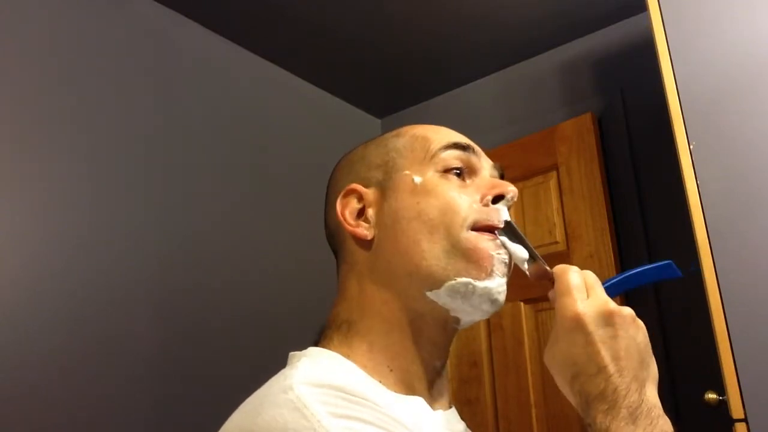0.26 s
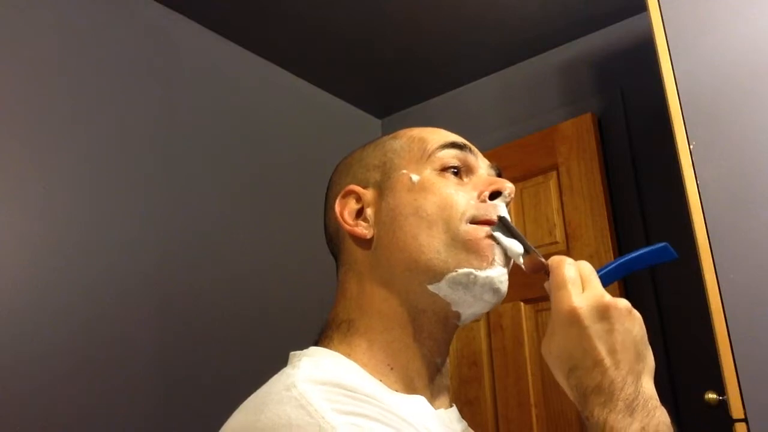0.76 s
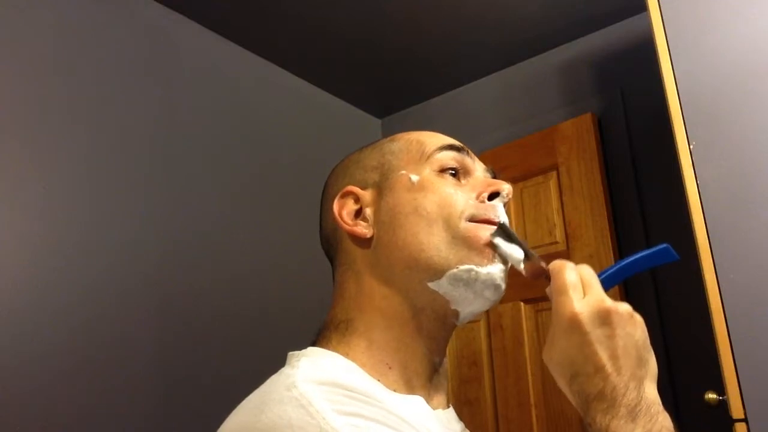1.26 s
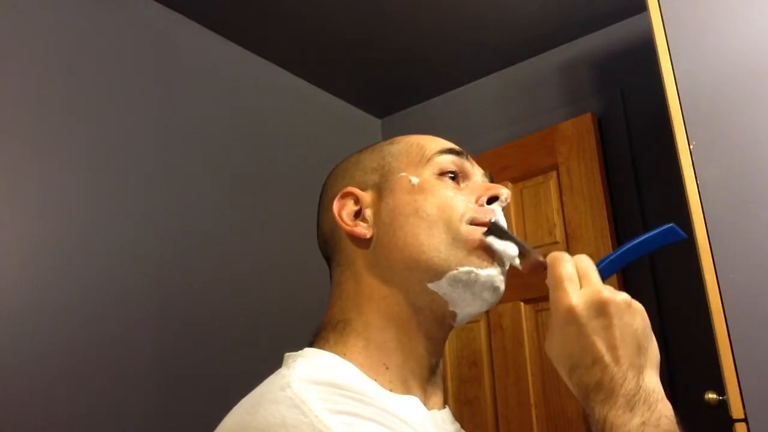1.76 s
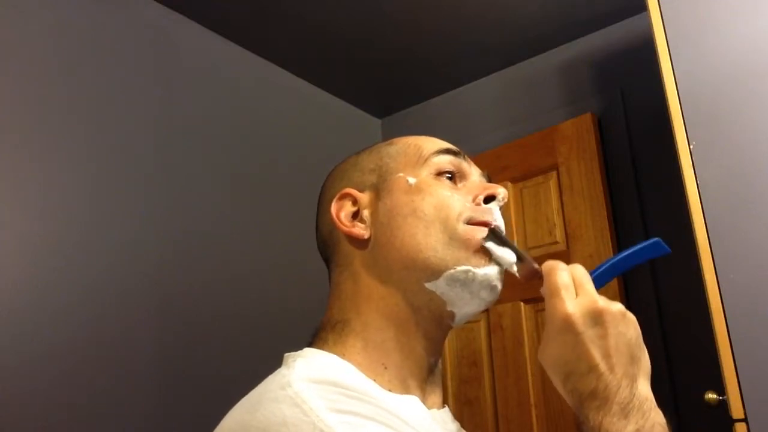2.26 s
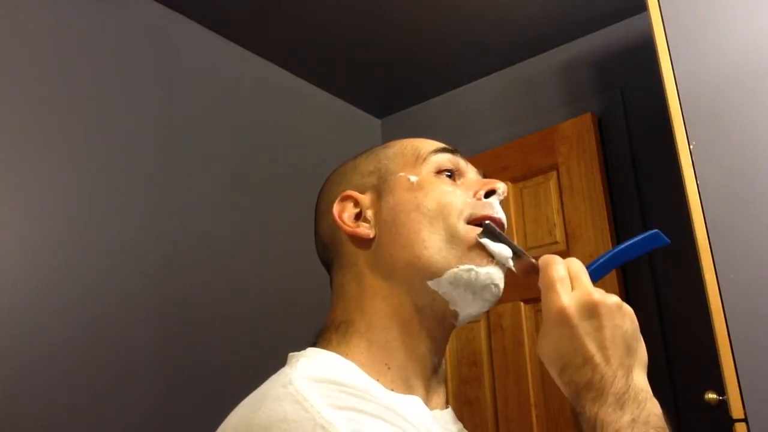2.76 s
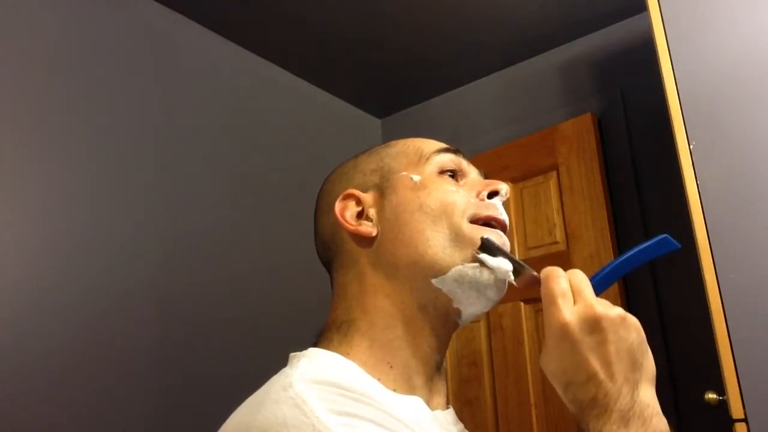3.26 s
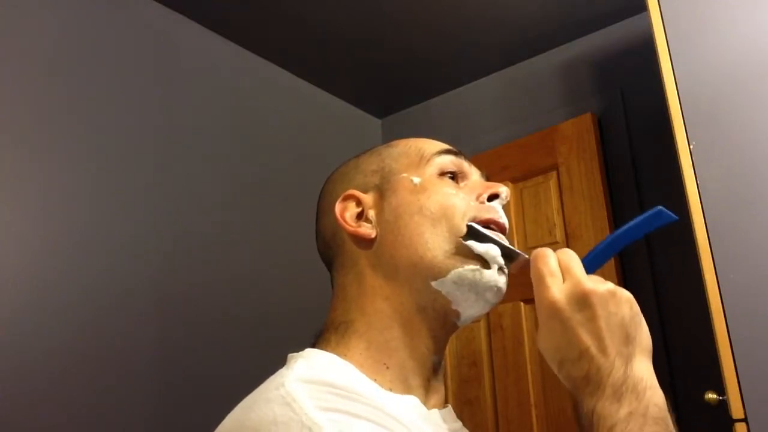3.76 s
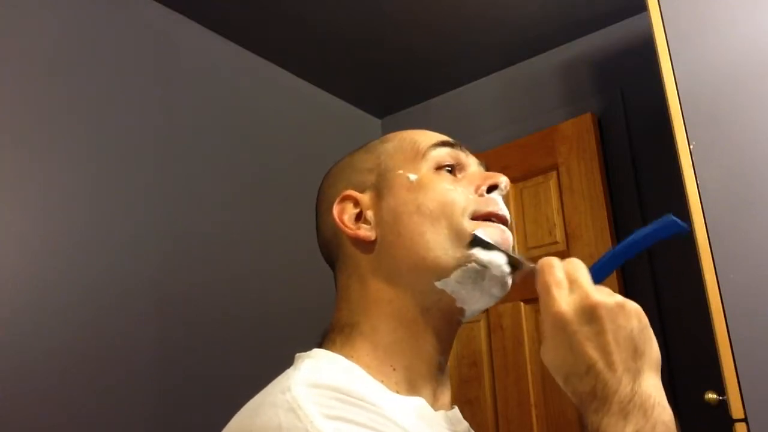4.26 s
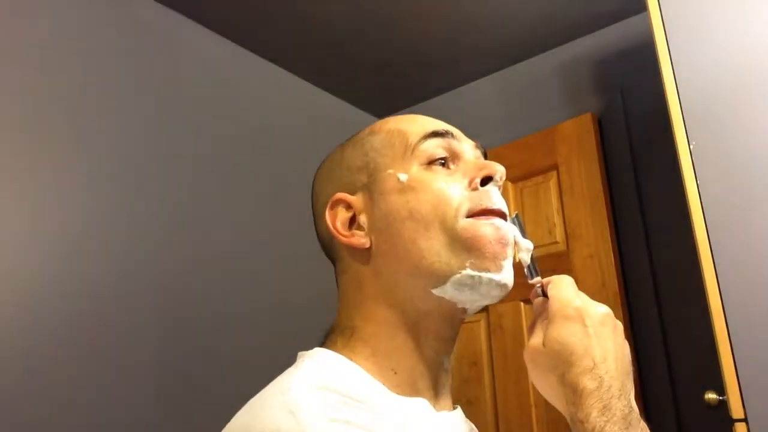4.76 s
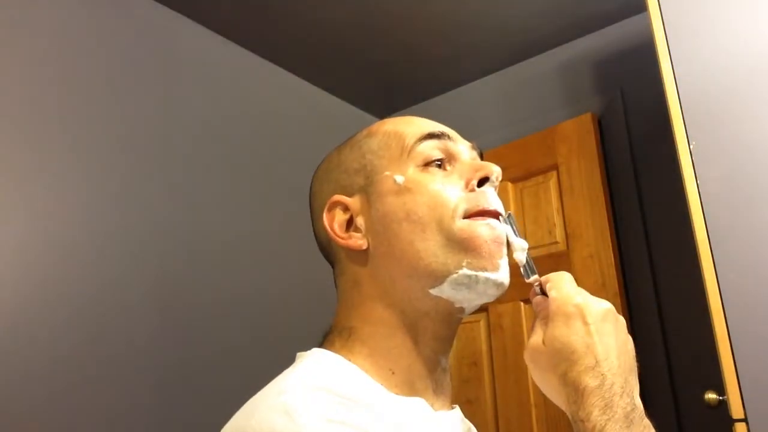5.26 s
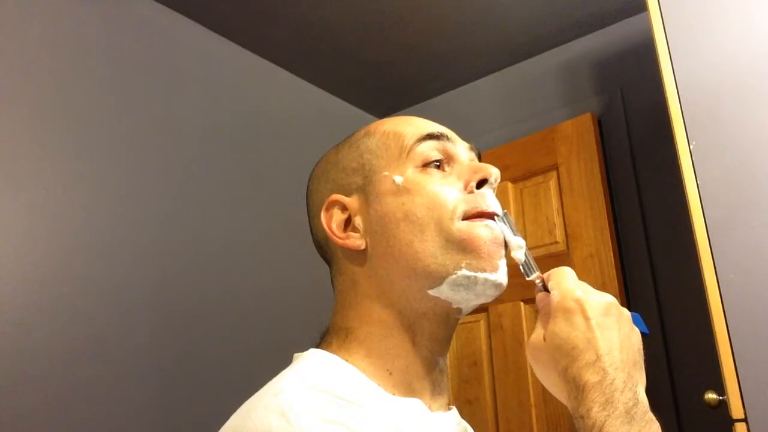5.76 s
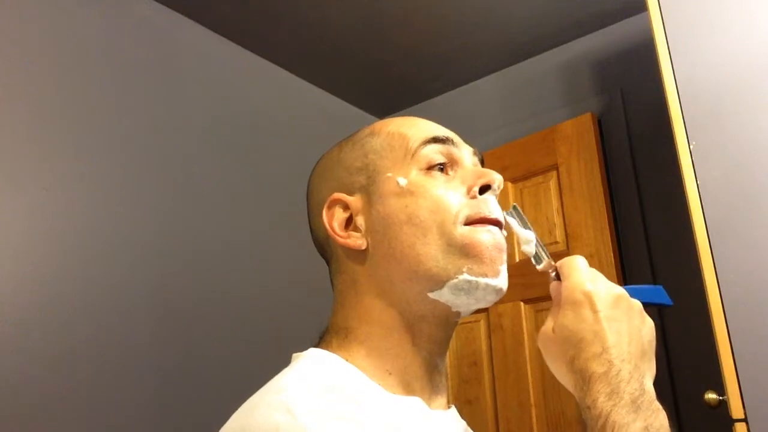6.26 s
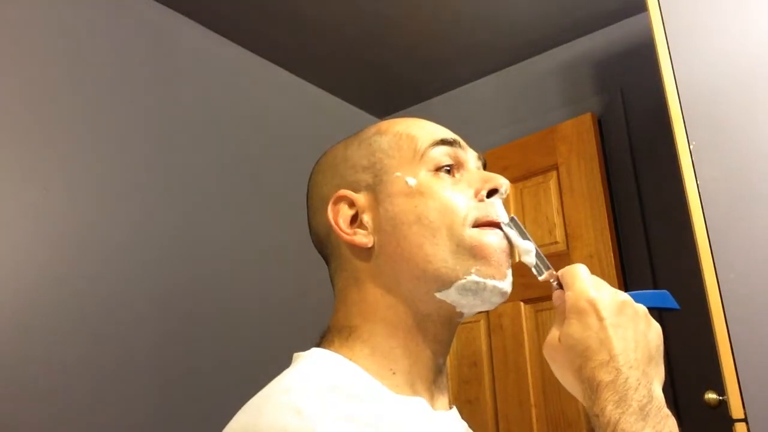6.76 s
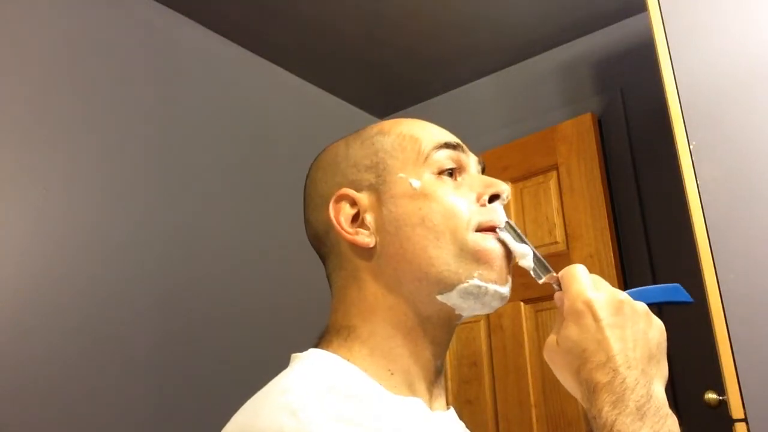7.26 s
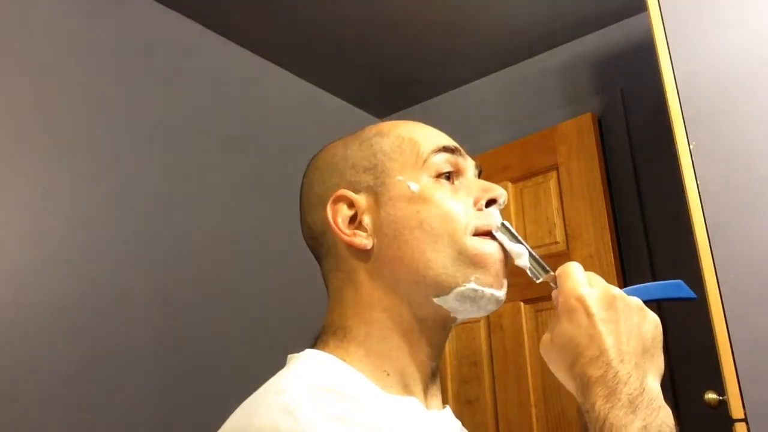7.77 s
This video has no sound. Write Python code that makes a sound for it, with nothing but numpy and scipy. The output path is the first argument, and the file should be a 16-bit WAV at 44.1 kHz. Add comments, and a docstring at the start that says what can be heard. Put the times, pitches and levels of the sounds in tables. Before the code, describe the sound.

A straight razor scrapes through stubble in quick, short strokes, each a thin, crisp rasp with tiny crackles as whiskers snap against the blade. The strokes come a few a second, stop briefly just past the middle, then return more sparsely and fade a little. An extractor fan hums and rushes steadily throughout. The razor sounds close, with a slight echo from a small tiled bathroom.

```python
"""Over the steady hum and rush of an extractor fan, a straight razor scrapes stubble in short strokes.
Each whisker that snaps against the edge is an impulse that rings the modes of the thin blade.
The tiles of the small bathroom return the scraping as a short reverberation,
and the standing waves of the room colour the rush of the fan."""
import sys
import numpy as np
from scipy import signal
from scipy.fft import rfft, irfft, next_fast_len
from scipy.io import wavfile
from scipy.ndimage import uniform_filter1d

SR = 44100
rng = np.random.default_rng(int(sys.argv[2]) if len(sys.argv) > 2 else 0)


def output_pcm(signal):
    """Save a mono or channel-first signal as 16-bit PCM at the path in sys.argv[1].

    Samples are clipped to [-1, 1] before scaling.
    """
    pcm = np.clip(np.atleast_2d(signal).T, -1, 1) * 32767
    wavfile.write(sys.argv[1], SR, np.round(pcm).astype(np.int16))


N = 353682


def gain_of(db):
    """Amplitude ratio of a level in decibels."""
    return 10 ** (np.asarray(db) / 20)


def unit_rms(x):
    """Normalisation to a root mean square of 1."""
    return x / np.sqrt(np.mean(x ** 2) + 1e-30)


def curve_at(points, hz):
    """Interpolation of (frequency, value) points on a logarithmic frequency axis."""
    freqs, values = np.transpose(points)
    return np.interp(np.log(hz + 1), np.log(freqs + 1), values)


def smooth_noise(count, span):
    """Low-pass noise of rms 1: two moving averages correlate neighbouring values."""
    return unit_rms(uniform_filter1d(uniform_filter1d(rng.standard_normal(count), span), span))


def wander(top_hz):
    """Superposition of slow sines in random phase: a fluctuation of rms 1."""
    t = np.arange(0, N + 256, 256) / SR
    rates = np.geomspace(.1, top_hz, num=20)
    slow = sum(np.sin(2 * np.pi * (f * t + rng.random())) / np.sqrt(f) for f in rates)
    return np.interp(np.arange(N) / SR, t, unit_rms(slow))


def minimum_phase(db):
    """Minimum-phase impulse response of energy 1: the shortest causal ring with this spectrum."""
    log_gain = np.log(gain_of(np.concatenate([db, db[-2:0:-1]])))
    ring = np.fft.ifft(np.exp(np.conj(signal.hilbert(log_gain)))).real
    return ring / np.linalg.norm(ring)


def fan_hum():
    """Periodic forces give a line spectrum; all tones waver but the loud one, locked to the mains."""
    # motor hum and the tones beside it: (frequency [Hz], rms level [dB])
    motor_tones = [(42.88, -76.2), (92.38, -66.3), (116.56, -67.6), (166.06, -61.8), (190.12, -72.8),
                   (239.75, -40.4), (313.38, -78.2)]
    # shaft harmonics: (multiple of the shaft speed [1], rms level [dB])
    shaft_harmonics = [(1, -79.7), (4, -72.4), (5, -75.4), (6, -74.0), (7, -76.0), (8, -70.9), (9, -78.8),
                       (10, -78.6), (12, -75.9)]
    shaft_hz = 56.79
    tones = list(motor_tones) + [(round(k) * shaft_hz, db) for k, db in shaft_harmonics]
    t = np.arange(N) / SR
    drift_s = np.cumsum(.00039 * wander(1.5)) / SR  # the speed is never quite even
    hum = 0
    for hz, db in tones:
        mains_locked = db > -50
        clock, waver_db = (t, 0) if mains_locked else (t + drift_s, .8)
        phase = 2 * np.pi * (hz * clock + rng.random())
        hum += np.sqrt(2) * gain_of(db + waver_db * wander(2.3)) * np.sin(phase)
    return hum


def fan_rush():
    """Broadband air noise, lifted and hollowed by the standing waves of the room."""
    # spectrum of the rush and a faint hiss: (frequency [Hz], relative density [dB])
    air_spectrum = [(20, -8.5), (60, -10.5), (150, 3), (420, 0), (800, -9.5), (1300, -11.5), (1750, -15),
                    (2100, -28), (2700, -26), (3300, -33.5), (3900, -33), (5200, -40.5), (13500, -47),
                    (15500, -55)]
    # peaks and dips from standing waves: (frequency [Hz], width [Hz], gain [dB])
    standing_waves = [(323, 62, -6.4), (375, 43, 7.2), (417, 40, -3.5), (452, 22, 2.9), (495, 18, -5.8),
                      (565, 81, 5.6), (601, 51, -9.5), (685, 57, 2.8), (730, 53, -4.7), (791, 21, 5.2),
                      (876, 124, 7.3), (954, 75, -8.5), (1032, 56, 5.8), (1095, 46, -2.9), (1212, 71, 4.0),
                      (1381, 113, -4.1), (1432, 68, 3.8), (1517, 51, -3.1), (1544, 55, 3.2),
                      (1631, 23, -3.0), (1749, 27, -3.5), (1780, 62, 3.3), (1874, 90, -4.0),
                      (1948, 54, 2.7)]
    size = next_fast_len(N)
    hz = np.fft.rfftfreq(size, 1 / SR)
    room_db = sum(db * np.exp(-np.log(16) * ((hz - f) / width) ** 2) for f, width, db in standing_waves)
    # higher up the modes crowd into an uneven comb
    comb_db = 2.5 * np.tanh(smooth_noise(len(hz), 250)) * (hz > 2050) * (hz < 4000)
    colour = gain_of(curve_at(air_spectrum, hz) + room_db + comb_db)
    rush = irfft(rfft(rng.standard_normal(size)) * colour)[:N]
    return gain_of(-56.5) * unit_rms(rush)


def tile_echoes(sound):
    """Reverberation: sparse reflections of random sign decay exponentially, the treble first."""
    # decay of the tiled room: (frequency [Hz], reverberation time T60 [s])
    decay_times = [(3000, 0.26), (8000, 0.1), (15000, 0.061)]
    reflections = np.zeros(SR // 2)
    slots = np.arange(80, SR // 2 - 20, 10)
    reflections[slots + rng.integers(0, 10, len(slots))] = rng.choice([-1., 1.], len(slots))
    hz, t, spectra = signal.stft(reflections, SR, nperseg=128)
    decay = gain_of(-60 * t / curve_at(decay_times, hz)[:, None])
    tail = signal.istft(spectra * decay, SR, nperseg=128)[1]
    return signal.fftconvolve(sound, tail / np.linalg.norm(tail))[:N]


def snaps(per_s, spread_db, clump_db):
    """Shot noise of rms 1: whiskers part at random, most snaps small, the louder ones in clumps."""
    size = gain_of(spread_db * np.minimum(rng.exponential(1, N), 4))
    sign = rng.choice([-1., 1.], N)
    clumps = gain_of(clump_db * smooth_noise(N, 130))
    parting = rng.random(N) < per_s / SR
    return unit_rms(size * sign * clumps * parting)


def volley(length_s):
    """Envelope of a volley of snaps: a fast rise and a Gaussian fall."""
    progress = np.arange(3000) / SR / max(length_s, .001)
    return np.exp(-progress ** 2) * (1 - np.exp(-progress / .37))


def drag_envelope():
    """Each pull of the blade swells, glides in level and decays exponentially."""
    # one to three pulls a stroke: (time [s], duration [s], start level [dB], end level [dB])
    pulls = [(0.325, 0.018, -59, -64), (0.41, 0.033, -80, -66), (0.587, 0.058, -72, -74),
             (0.666, .025, -79, -78), (0.817, .09, -75.5, -71.5), (1.008, .065, -82, -69),
             (1.079, 0.036, -69, -75), (1.215, 0.092, -74, -68.5), (1.418, 0.1, -78, -70.5),
             (1.666, 0.078, -80, -79.5), (1.751, 0.022, -69.5, -72.5), (1.914, .012, -72, -73),
             (1.957, .086, -85, -70), (2.186, 0.074, -84, -63), (2.29, .015, -74, -74),
             (2.388, 0.09, -80, -66), (2.486, 0.024, -73, -70), (2.619, 0.06, -71.5, -63.5),
             (2.703, .02, -72, -77), (2.747, 0.027, -72, -78), (2.807, 0.099, -64.5, -70),
             (2.999, 0.084, -68, -66), (3.201, .035, -72, -64), (3.249, 0.036, -65, -66.5),
             (3.401, .085, -72, -66), (3.518, .02, -74, -73), (3.615, 0.073, -75, -62),
             (3.72, .02, -72, -70), (3.846, 0.048, -71.5, -65.5), (3.909, 0.028, -67, -64.5),
             (4.055, 0.083, -78, -66), (4.155, .02, -77, -78), (4.252, 0.045, -70, -67),
             (4.824, 0.12, -79, -83), (4.943, 0.02, -64.5, -66.5), (4.986, 0.011, -68, -70),
             (5.197, 0.064, -79.5, -68.5), (5.291, 0.035, -79, -70), (5.503, 0.11, -72, -70),
             (5.756, 0.053, -76, -70.5), (5.832, 0.039, -77, -71), (5.972, 0.066, -71, -74),
             (6.159, 0.048, -79, -63.5), (6.608, 0.03, -71, -72.5), (6.669, 0.032, -70, -74.5),
             (6.734, .045, -66, -73), (6.957, 0.043, -71, -74), (7.017, 0.047, -73, -71),
             (7.226, 0.049, -72, -70), (7.468, 0.052, -74, -70.5), (7.687, 0.033, -74, -70),
             (7.854, 0.039, -78, -75)]
    attack_s, release_db_per_s = .01, 600
    drag = np.zeros(N)
    for start, length, start_db, end_db in pulls:
        t = np.arange(0, length + .1, 1 / SR)
        db = np.interp(t, [0, length], [start_db, end_db]) - release_db_per_s * np.maximum(t - length, 0)
        envelope = gain_of(db) * np.minimum(t / attack_s, 1)
        part = drag[round(start * SR):][:len(t)]
        part += envelope[:len(part)]
    return drag


def whisker_force():
    """Impulsive excitation: dense small snaps under each pull, volleys where the edge catches a tuft."""
    # tufts cut, the faint entries being the blade landing on skin: (time [s], level [dB], duration [s])
    catches = [(.203, -65.5, .004), (.3334, -51, 0.0055), (.3904, -54.5, .0064), (0.4274, -57, .0023),
               (0.436, -46, 0.0067), (.562, -70, .004), (0.6168, -52, 0.0034), (0.669, -53.5, .0054),
               (.886, -52, .0034), (0.9094, -51.5, .0022), (1.0196, -56, .003), (1.0608, -56, .0042),
               (1.0926, -50, 0.0027), (1.2343, -57, .0055), (1.2871, -51, .0044), (1.4281, -64, 0.0028),
               (1.4995, -58, .0052), (1.637, -68, .004), (1.6823, -59, .0029), (1.7785, -53, .0019),
               (1.9224, -58, .0031), (1.9631, -54, .004), (2.0019, -51, .0039), (2.034, -51, 0.0044),
               (2.1929, -59, .0019), (2.2087, -55, .0026), (2.2458, -50, .0026), (2.2569, -49, .0044),
               (2.2942, -47.5, .0021), (2.3899, -56, .002), (2.4043, -51.5, .002), (2.4523, -52, .0046),
               (2.4674, -45.5, 0.0058), (2.51, -51, 0.0025), (2.672, -42.5, .0036), (2.7137, -50, 0.0052),
               (2.7536, -56, .002), (2.8158, -54, .0028), (2.8658, -51, .0036), (2.8945, -53, .0022),
               (2.9089, -58, .0036), (2.985, -66, 0.0044), (3.0107, -48, .002), (3.073, -46.5, .0091),
               (3.181, -69, .004), (3.2682, -50, .006), (3.328, -62, 0.0034), (3.4639, -47, .0043),
               (3.4838, -56, .0024), (3.5153, -54, .004), (3.528, -50.5, .0064), (3.608, -66, .004),
               (3.6934, -54, .004), (3.742, -52.5, .0032), (3.8409, -58, .002), (3.9298, -53, 0.0083),
               (3.9443, -47, .002), (4.0905, -54, .002), (4.1118, -49, .0022), (4.136, -48, .0029),
               (4.1659, -48, .0045), (4.2447, -61, .0027), (4.2763, -53, .0018), (4.3059, -48.5, .002),
               (4.8414, -55.5, .0036), (4.8677, -59, 0.0045), (4.9929, -49.5, .0058), (5.188, -70, .004),
               (5.2598, -57, 0.0055), (5.332, -52, .0045), (5.5221, -52, .0052), (5.5873, -54, .0031),
               (5.6206, -54, .0044), (5.7989, -52, .0033), (5.8424, -54, .0053), (5.8733, -57, 0.0052),
               (6.0066, -57, .0049), (6.0355, -52.5, .0065), (6.7486, -54, .0061), (6.9475, -57, .004),
               (6.9632, -53, .0059), (6.9799, -55, .0071), (7.0475, -60, .0038), (7.19, -71, 0.0045),
               (7.2175, -60, .0033), (7.2361, -54, 0.0029), (7.4765, -56, .0035), (7.678, -69, .004),
               (7.8845, -61, 0.0056)]
    opening_db, volley_db = 2, -7  # first snap and those after it, relative to the level of the catch
    lesser_per_s, lesser_db, lesser_s = 45, 4.5, .003  # lesser catches at random along every pull
    drag, bite, openings = drag_envelope(), np.zeros(N), np.zeros(N)
    for time, db, length in catches:
        onset = round(time * SR)
        part = bite[onset:onset + 3000]
        part += gain_of(db + volley_db) * volley(length)[:len(part)]
        openings[onset] = gain_of(db + opening_db)
    lesser = drag * gain_of(lesser_db + 2.5 * rng.standard_normal(N))
    lesser *= rng.random(N) < lesser_per_s / SR
    bite += signal.oaconvolve(lesser, volley(lesser_s))[:N]
    openings += gain_of(opening_db - volley_db) * lesser
    scrape = drag * snaps(per_s=2800, spread_db=2.9, clump_db=1.2)
    volleys = bite * snaps(per_s=2500, spread_db=4.7, clump_db=.42)
    return scrape + volleys + openings


def blade_ring(force):
    """Modal resonance of the thin blade: each grip and each spot on the edge favours other modes."""
    # modes, with a relative level for each grip:
    # (frequency [Hz], width [Hz], at the lip [dB], on the cheek [dB], razor turned over [dB])
    modes = [(4180, 360, -9, 0, -6.5), (4530, 340, 3, -1, 6.5), (5700, 820, -17.5, -14.5, -6.5),
             (6570, 150, -7, -5, -3.5), (7230, 290, -1, -1, 2.5), (7660, 190, 5, 7, 0.5),
             (8126, 200, 8, 4, 9.5), (8620, 210, 2, 4.5, -2), (8940, 140, 5.5, 5.5, 3.5),
             (9440, 200, 4, 5, 4.5), (10240, 330, 5.5, 4.5, -11.5), (10980, 310, 2.5, 4.5, -0.5),
             (11930, 250, 3.5, 3, -4.5), (12540, 1100, -4.5, -7.5, -6), (14700, 2400, -3.5, -4, -5)]
    # bare snap of a whisker: (frequency [Hz], relative density [dB])
    snap_spectrum = [(1760, -46.5), (3000, -14), (3440, -12.5), (4320, -7), (5350, -11.5), (7400, -3.5),
                     (10400, -2.5), (15600, -12)]
    grip_changes_s, spots, detune = (2.13, 4.6), 5, .012
    hz, sound = np.fft.rfftfreq(2048, 1 / SR), np.zeros(N + 2048)
    # the heavy low modes feel the summed drag of many whiskers rather than single snaps
    rub = np.sqrt(abs(uniform_filter1d(force ** 2, 300))) * rng.standard_normal(N)
    lowpass = signal.butter(4, 5400, fs=SR, output="sos")
    drive = force + .61 * signal.sosfiltfilt(lowpass, rub - force)
    cut_spot = np.repeat(rng.integers(0, spots, N // 300 + 1), 300)[:N]  # the cut hops every few ms
    bounds = [0] + [round(s * SR) for s in grip_changes_s] + [N]
    for grip, (start, end) in enumerate(zip(bounds, bounds[1:])):
        favour_db = 3 * rng.standard_normal((spots, len(modes)))
        favour_db -= favour_db.mean(0)  # over the whole edge no mode wins
        tuning = 1 + detune * rng.standard_normal((spots, len(modes)))  # skin and lather detune the modes
        for spot in range(spots):
            power = gain_of(curve_at(snap_spectrum, hz)) ** 2
            for (f, width, *grip_db), lift_db, ratio in zip(modes, favour_db[spot], tuning[spot]):
                offset = 2 * (hz - f * ratio) / width
                power += gain_of(grip_db[grip] + lift_db) ** 2 / (1 + offset ** 2) ** 1.5
            hits = (drive * (cut_spot == spot))[start:end]
            sound[start:end + 2047] += signal.oaconvolve(hits, minimum_phase(10 * np.log10(power)))
    return sound[:N]


def scene():
    """Superposition of the fan, the echoes and the direct sound of the razor, in one channel."""
    razor = blade_ring(whisker_force())
    echoes = gain_of(-5.5) * tile_echoes(razor)
    return (fan_hum() + fan_rush() + echoes + razor)[None]


def record(dry):
    """Band limiting by a linear-phase low-pass filter."""
    cutoff_hz = 15730
    lowpass = signal.firwin(1023, cutoff_hz, window=("kaiser", 9), fs=SR)
    return signal.oaconvolve(dry, lowpass[None], "same")


dry = scene()
out = record(dry)
output_pcm(out)
```